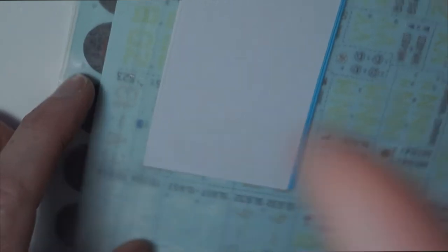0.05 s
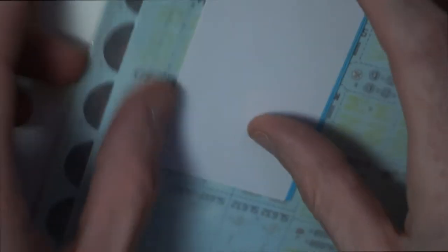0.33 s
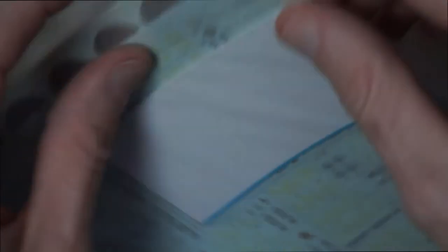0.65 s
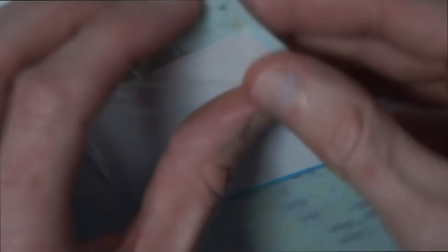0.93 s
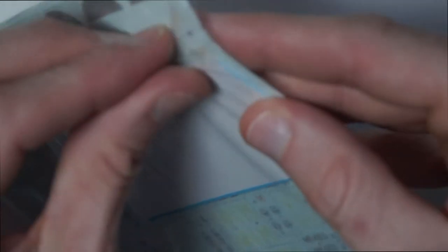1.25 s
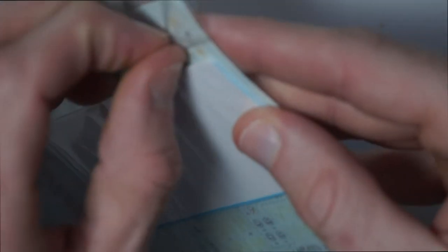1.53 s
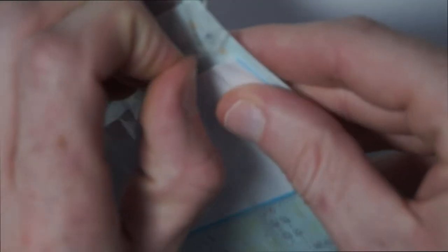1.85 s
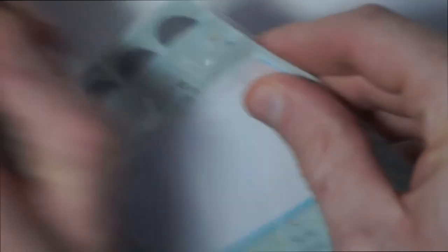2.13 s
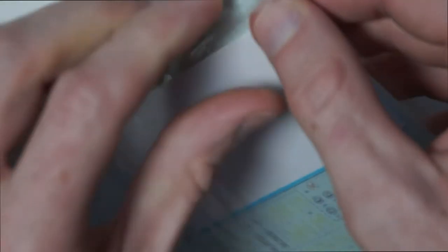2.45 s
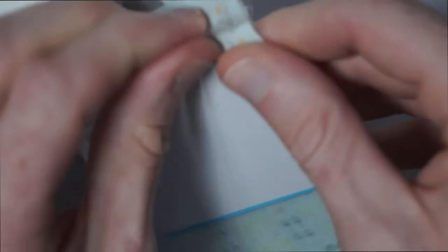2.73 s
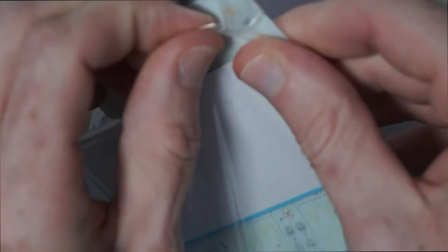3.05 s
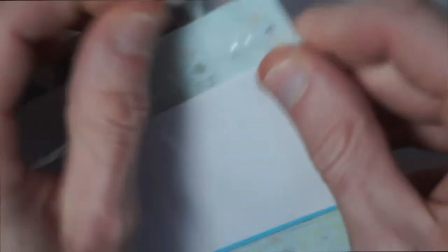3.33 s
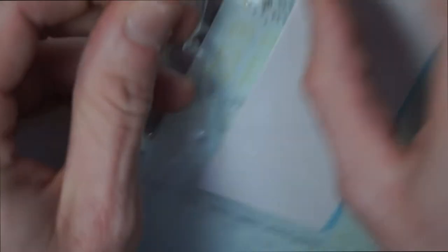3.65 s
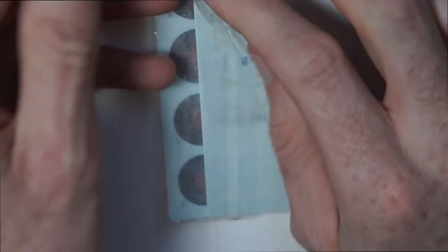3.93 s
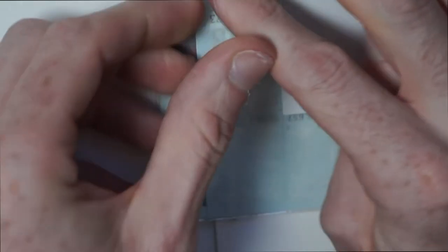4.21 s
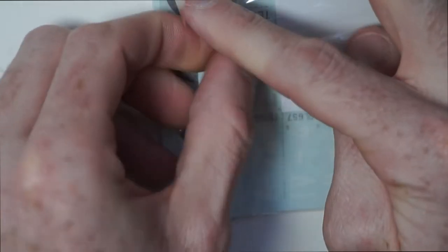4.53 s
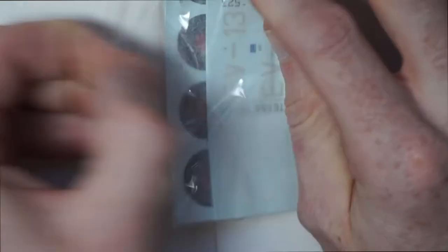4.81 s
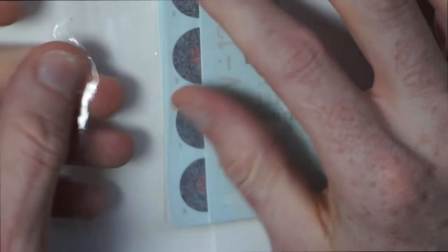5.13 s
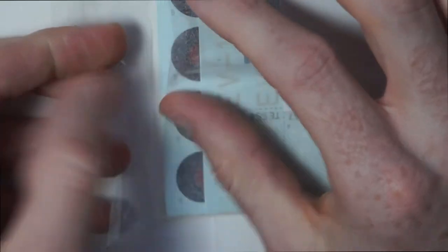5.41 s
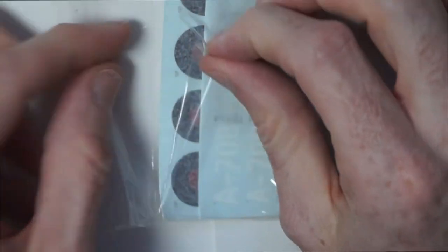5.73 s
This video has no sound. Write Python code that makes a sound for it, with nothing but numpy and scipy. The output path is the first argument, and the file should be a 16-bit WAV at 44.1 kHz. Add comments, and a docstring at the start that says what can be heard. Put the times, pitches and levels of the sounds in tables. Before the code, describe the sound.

Hands work thin decal sheets out of a plastic sleeve, close to the microphone in a small room. At first the sheets slide softly with a grainy hiss, fingertip rubs and scattered dry snaps. The sleeve crumples loudly about halfway through and again a little later, then gives a run of small pops. Faint room noise lies underneath.

```python
"""Small room, stereo microphone close to two hands working thin decal sheets out of a plastic sleeve.
For three seconds the sheets slide softly with a grainy hiss, fingertips rub the film and creases pop over
with dry snaps that ring for a few cycles. The sleeve crumples loudly at 3.2 s and again at 4.7 s;
a run of small pops fills the last second. Faint room noise lies under it all."""
import sys
import numpy as np
from scipy import signal
from scipy.fft import rfft, irfft, next_fast_len
from scipy.io import wavfile
from scipy.ndimage import uniform_filter1d

SR = 44100
rng = np.random.default_rng(int(sys.argv[2]) if len(sys.argv) > 2 else 0)


def put_to_file(sound):
    """Save the sound as 16-bit audio at rate SR, in the file named by the first command-line argument."""
    columns = np.atleast_2d(sound).T  # one column per channel
    safe = np.clip(columns, -1, 1)
    whole_steps = np.round(safe * 32767)
    wavfile.write(sys.argv[1], SR, whole_steps.astype(np.int16))


N = 258867

# pushes of the hands: start/s, rise/s, hold/s, relative friction level/dB, body lift/dB, treble lift/dB
PUSHES = [(0, 0.0033, 0.023, -58, -3, -2), (0.215, 0.062, .05, -49, 8.5, -3),
          (.335, 0.091, 0.0035, -48, 8, 0), (0.512, 0.0096, 0.084, -57.5, -1, 11),
          (0.618, 0.0083, 0.0046, -43, -3, 0), (0.819, 0.047, 0.076, -42, 1.5, -0.5),
          (1.019, 0.016, 0.0052, -45, -1.5, 0.5), (1.093, 0.031, 0.21, -55, -2, 2.5),
          (1.365, 0.013, 0.016, -48, -2, 3), (1.64, 0.018, 0.29, -49.5, 4.5, 0),
          (1.773, 0.013, 0.042, -44.5, -4, -0.5), (1.903, 0.044, .01, -43, -8, 4),
          (2.026, 0.0032, 0.0051, -46, -2, 16), (2.102, 0.0029, 0.015, -35, 1, 1),
          (2.176, 0.032, 0.079, -55.5, -4, 7), (2.376, 0.043, .08, -56.5, 10, 4),
          (2.558, 0.031, 0.0081, -46.5, 5.5, 1), (2.651, 0.0062, 0.05, -47.5, 2, 3.5),
          (2.715, 0.051, .04, -36, -5.5, 0.5), (2.939, 0.053, 0.0056, -54, -6.5, 6.5),
          (3.154, 0.056, 0.0077, -41, 0.5, -0.5), (3.2, 0.0072, 0.033, -15.5, -9.5, -2.5),
          (3.304, .04, .02, -38, 1, -1), (3.451, 0.0082, 0.049, -36.5, -1.5, -4.5),
          (3.505, 0.008, .004, -34, 2.5, 2), (3.547, 0.038, 0.19, -51, 1.5, 3.5),
          (3.793, 0.019, 0.058, -42, -4.5, -2.5), (3.891, 0.0077, 0.0054, -32.5, -3, 0),
          (3.892, .02, 0.091, -49.5, 16.5, -3), (4.273, 0.037, 0.018, -38, -4, -2.5),
          (4.457, 0.022, 0.06, -35, -6, -2.5), (4.597, 0.11, 0.031, -41, 2.5, 1),
          (4.737, 0.0052, .092, -21.5, -10, 1.5), (4.892, 0.0049, 0.0072, -29.5, -6, -9),
          (5.009, 0.0078, 0.03, -42, -4.5, -12.5), (5.093, 0.016, 0.029, -37, -9, -3.5),
          (5.297, 0.052, .06, -48.5, 1, -0.5), (5.546, 0.01, 0.1, -47.5, -0.5, 1.5),
          (5.714, 0.01, 0.1, -44, -7, -1.5)]
# sheets merely held never lie quite still: relative friction level/dB, body lift/dB, treble lift/dB
HELD_FRICTION = (-63.5, 7.9, -9.5)
# creases cracking over: t/s, level/dB, body lift/dB, treble lift/dB
CREASE_CRACKS = [(0.2027, -63, 26, -20), (0.388, -35.5, 11.5, -7.5), (.437, -40.5, 3, 2),
                 (0.4717, -43.5, -1, -2.5), (0.5269, -44.5, 4, 8), (.632, -50, -12, 11.5),
                 (0.6432, -42, -5, 10), (.84, -40.5, 5, -9), (0.8624, -48, 4, 8), (0.995, -45, -10, -9),
                 (1.078, -39, -10, -5), (1.1203, -45.5, 9, 5), (1.1585, -43, 4, 3.5),
                 (1.1705, -39.5, -33, -0.5), (1.2115, -41.5, -7, 1.5), (1.2861, -42.5, 2.5, 5.5),
                 (1.3432, -49.5, -4, 6), (1.3876, -40, -5, 5.5), (1.446, -51, 8.5, 5),
                 (1.6283, -55.5, -6, 10), (1.653, -45.5, 6, 13), (1.6744, -43, -5, -2),
                 (1.7928, -37.5, -10, 4), (1.8282, -34.5, -7, -2), (1.9416, -45, 16.5, 7),
                 (1.968, -30, -18, -12), (2.0311, -39, -4, 17), (2.1018, -27, 7, 1.5),
                 (2.122, -30.5, -7, 3), (2.2196, -39, -8, 3.5), (2.2845, -37.5, -10, 1),
                 (2.5709, -54, 6, 14), (2.655, -52, 2, 17.5), (2.7896, -42.5, -6, 2),
                 (2.8327, -36.5, 2.5, 6.5), (2.8552, -41, 10.5, 6.5), (2.944, -39.5, 1.5, 2.5),
                 (2.983, -35.5, -10.5, 0.5), (3.0706, -50, 8, -3.5), (3.0956, -37.5, -2, -8),
                 (3.1495, -46, -7, 4), (3.2036, -26.5, -13, 13), (3.3368, -30, -9, 7.5),
                 (3.4716, -37, -20, -2.5), (3.5217, -24.5, -0.5, -4), (3.833, -40.5, 2.5, 7),
                 (3.896, -28, -7, -7), (3.9169, -39, -6, 11.5), (4.119, -45, -1, 2.5),
                 (4.184, -45.5, -5, -19), (4.2495, -45, 1, -6), (4.3177, -43.5, -8.5, 2.5),
                 (4.4525, -51.5, 6.5, 9.5), (4.484, -31.5, -13, 2), (4.5422, -31.5, -21, 0.5),
                 (4.728, -15.5, -13.5, -5), (4.7407, -18, -18.5, -2.5), (4.794, -26.5, 1.5, 10),
                 (4.847, -17.5, -13, -25), (4.8963, -23.5, -6, 4.5), (5.371, -44.5, -14, 9.5),
                 (5.6365, -48.5, -10, 14.5), (5.7762, -34.5, -19.5, 0), (5.823, -38, 1.5, 5.5)]
# sleeve facets popping through: t/s, ring f/Hz, relative ring level/dB, crack level/dB, treble lift/dB
SLEEVE_POPS = [(1.389, 912, -47, -66, -15), (3.5221, 1027, -32, -30, -17), (3.7563, 1742, -46.5, -48, -21),
               (3.8183, 2403, -45.5, -39, -11), (4.5901, 3190, -40.5, -42, 9),
               (4.624, 3500, -45.5, -47, -8), (4.7568, 2840, -25, -27, 8), (4.8338, 3225, -24.5, -38, 1),
               (5.0118, 2960, -45, -31.5, -13), (5.0443, 2070, -43, -38.5, -4.5),
               (5.0984, 2120, -38, -41, -3), (5.1107, 2700, -39, -34, 1.5),
               (5.1369, 2910, -42, -18.5, -11.5), (5.169, 2770, -51, -30.5, -9),
               (5.2389, 2570, -38.5, -34.5, -10.5), (5.2824, 4380, -46, -45.5, 1.5),
               (5.3143, 2830, -45.5, -33.5, -18.5), (5.3476, 3680, -53, -30.5, -6),
               (5.427, 3760, -44.5, -40, -1), (5.5055, 2920, -52, -48, -11),
               (5.611, 4160, -47.5, -36.5, -3), (5.6566, 3575, -35.5, -35, -9.5),
               (5.695, 2980, -48.5, -39, -4), (5.7282, 2830, -34, -30.5, -7)]
# fingertips and sheet edges dragging on the film: start/s, peak/s, end/s, f/Hz, width/Hz, level/dB
FILM_RUBS = [(0.336, 0.343, 0.387, 784, 790, -40.5), (0.367, 0.379, .416, 830, 676, -41.5),
             (0.37, 0.385, .418, 1700, 1400, -42), (0.428, 0.603, 0.74, 1540, 501, -65),
             (2.096, 2.117, 2.15, 531, 377, -52), (2.38, 2.481, 2.63, 1685, 601, -67),
             (2.735, 2.787, 2.83, 2510, 800, -49), (3.208, 3.253, 3.29, 1201, 600, -36.5),
             (3.204, 3.234, 3.28, 4682, 416.3, -33.5), (3.565, 3.613, 3.648, 1570, 446.6, -47),
             (3.598, 3.627, 3.648, 2257, 500, -50), (3.95, 3.98, 4.14, 1113, 130.8, -61.5),
             (4.734, 4.8, 4.9, 3093, 1363, -33), (5.092, 5.151, 5.2, 3506, 1405, -47.5),
             (5.646, 5.643, 5.75, 3910, 894, -55)]
# colour of everything heard close by, with fixed humps near 1 kHz, 1.55 kHz and 2.9 kHz: f/Hz, level/dB
CLOSE_COLOUR = [(30, -26), (110, -27.5), (190, -23), (290, -12.5), (440, -7), (770, -3), (1020, 0),
                (1280, -3), (1550, 0.5), (2000, -3), (2900, -1), (5500, -1.5), (10000, -1.98),
                (15500, -2.1)]
# reach of the body lift, from a whole sheet bending: f/Hz, share/0..1
BODY_SHARE = [(110, 0.7), (330, 0.78), (800, 1), (1300, 0.69), (2600, 0.02)]
# reach of the treble lift, from the fine edges: f/Hz, share/0..1
TREBLE_SHARE = [(3200, 0), (5500, 0.47), (8500, 0.98)]
# likeness of the two microphone ports for close sound: f/Hz, correlation/-1..1
CLOSE_LIKENESS = [(40, 0.8), (150, 0.75), (300, 1), (900, 0.92), (2600, 0.87), (5000, 0.61), (9000, 0.32),
                  (15000, 0.27)]
# decay of the small room: f/Hz, t60/s
ROOM_DECAY = [(150, 0.13), (600, 0.15), (2500, 0.13), (7000, 0.13), (15000, 0.074)]
# colour of room noise and microphone hiss: f/Hz, level/dB
FLOOR_COLOUR = [(25, -19), (130, -11.5), (250, -5), (450, 3), (750, 1.5), (1100, 2), (1600, 0),
                (2500, -2.5), (5000, -6), (10000, -8.5), (15500, -10)]
# likeness of that noise in the two ports: f/Hz, correlation/-1..1
FLOOR_LIKENESS = [(50, 0.18), (300, -0.1), (750, -0.76), (1200, -0.43), (2000, -0.33), (6000, 0.14),
                  (15000, -0.11)]

LIGHT_PUSH_DB = -52  # friction of a light push; above it catches crowd together and crinkles grow
HAND_STEP = 64  # samples between readings of the hands' effort


def sliding(catches_per_s=600, crowd_slope=0.55, spread_db=4, catch_s=0.0019, hiss=0.75, patchy_db=2.5):
    """Sheet catches on sheet over a smooth hiss; each moment a different patch of film radiates."""
    grid = np.arange(0, N, HAND_STEP) / SR
    level_db, body_db, treble_db = handling(grid)
    effort_db = np.maximum(np.interp(np.arange(N) / SR, grid, level_db) - LIGHT_PUSH_DB, 0)
    crowding = from_db(crowd_slope * effort_db)  # harder work, denser catches
    sizes = from_db(spread_db * np.minimum(rng.exponential(1, N), 4))
    sizes *= rng.random(N) < crowding * catches_per_s / SR
    catch_power = signal.lfilter([1], [1, -np.exp(-2 / (catch_s * SR))], sizes ** 2 / crowding)
    friction = unit_rms(port_noise(N) * np.hypot(hiss, unit_rms(np.sqrt(catch_power))))
    hz, t, spectra = signal.stft(friction, SR, nperseg=256, noverlap=192)
    patches = uniform_filter1d(rng.standard_normal(spectra.shape[1:]), size=4, axis=0)
    patches = unit_rms(uniform_filter1d(patches, size=12, axis=1))
    lift_db = sheet_lift(hz[:, None], np.interp(t, grid, body_db), np.interp(t, grid, treble_db))
    spectra *= from_db(np.interp(t, grid, level_db) + lift_db + patchy_db * patches)
    slide = signal.istft(spectra, SR, nperseg=256, noverlap=192)[1][:, :N]
    return panned(from_db(-3.5) * coloured(slide, CLOSE_COLOUR), left_db=-0.5)


def handling(t, settle_db_per_s=210):
    """Each push swells, holds and settles; gives friction level, body and treble in dB at times t."""
    start, rise, hold, level_db, body_db, treble_db = np.transpose(PUSHES)[:, :, None]
    settled_db = settle_db_per_s * np.maximum(t - start - rise - hold, 0)
    power = (np.clip((t - start) / rise, 0, 1) * from_db(level_db - settled_db)) ** 2
    held_db, held_body_db, held_treble_db = HELD_FRICTION
    held_power = from_db(held_db) ** 2
    total = power.sum(0) + held_power
    body = ((power * body_db).sum(0) + held_power * held_body_db) / total
    treble = ((power * treble_db).sum(0) + held_power * held_treble_db) / total
    return 10 * np.log10(total), body, treble


def sheet_lift(hz, body_db, treble_db):
    """Wide bends add body, tight creases and edges add treble; gives dB at each frequency."""
    return body_db * lookup(BODY_SHARE, hz) + treble_db * lookup(TREBLE_SHARE, hz)


def snap(level_db, body_db, treble_db, ring_hz, ring_db, crack_s=0.00015, rattle_s=0.0031, ring_cycles=2.2):
    """A crease buckles: a sharp crack, waves rattling through the film, a few cycles of the freed facet."""
    size = 2048
    t = np.arange(size) / SR
    burst = unit_rms(port_noise(size) * (np.exp(-t / crack_s) + 0.91 * np.exp(-t / rattle_s)))
    hz = abs(np.fft.fftfreq(size, 1 / SR))
    gain = from_db(lookup(CLOSE_COLOUR, hz) + sheet_lift(hz, body_db, treble_db))
    minimum_phase = np.exp(np.conj(signal.hilbert(np.log(gain))))  # keeps the attack sharp
    crack = np.fft.ifft(np.fft.fft(burst) * minimum_phase).real
    cycles = ring_hz * t
    swing = np.sin(2 * np.pi * cycles) * np.exp(-cycles / ring_cycles) * (1 - np.exp(-2 * cycles))
    ring = unit_rms(np.gradient(swing))  # a small facet radiates no bass
    sound = from_db(level_db) * crack + from_db(ring_db - 2) * ring
    sound *= np.sqrt(0.006 * SR / size)  # levels refer to a 6 ms span
    return panned(sound, left_db=-1.5)  # the hands work slightly right of the microphone


def crinkles(per_s=20, crowd_slope=0.4, light_db=-54, spread_db=3.5, low_hz=2200, high_hz=5000):
    """Small creases give way at random, oftener and stronger under a harder push; gives timed snap rows."""
    gap, size, pitch = rng.random((260, 3)).T
    grid = np.arange(0, N, HAND_STEP) / SR
    rate = per_s * from_db(crowd_slope * (handling(grid)[0] - LIGHT_PUSH_DB))
    times = np.interp(np.cumsum(-np.log(1 - gap)), np.cumsum(rate) * grid[1], grid)
    push_db, body_db, treble_db = handling(times)
    scatter_db = spread_db * np.minimum(-np.log(1 - size), 2)
    level_db = light_db + 0.81 * (push_db - LIGHT_PUSH_DB) + scatter_db
    ring_hz = low_hz * (high_hz / low_hz) ** pitch
    return np.transpose([times, level_db, body_db, treble_db, ring_hz, level_db - 13])[times < grid[-1]]


def rub(start, peak, end, hz, width_hz, level_db, slips_per_s=1500):
    """A fingertip or sheet edge sticks and slips unevenly, driving one resonance of the taut film."""
    t = np.arange(start, end, 1 / SR)
    slips = (rng.standard_normal(SR) * (rng.random(SR) < slips_per_s / SR))[:len(t)]
    edges_hz = [max(hz - width_hz / 2, 100), hz + width_hz / 2]
    resonance = signal.butter(2, edges_hz, "bandpass", fs=SR, output="sos")
    pressure = np.sqrt(np.interp(t, [start, peak, end], [0, 1, 0]))
    return panned(from_db(level_db) * pressure * unit_rms(signal.sosfilt(resonance, slips)), left_db=0)


def room(direct, desk_db=-11, desk_s=0.0025, tail_db=-10):
    """Quick reflections off desk and hands reach the microphone, then the short tail of the room."""
    size = SR // 2
    t = np.arange(size) / SR
    hz, frame_s, spectra = signal.stft(port_noise(size), SR, nperseg=256)
    spectra *= from_db(-60 * frame_s / lookup(ROOM_DECAY, hz)[:, None])
    tail = signal.istft(spectra, SR, nperseg=256)[1][:, :size] * (t > 0.007)
    desk = port_noise(size) * np.exp(-t / desk_s) * (t > 0.0015)
    echoes = (from_db(tail_db) * unit_rms(tail) + from_db(desk_db) * unit_rms(desk)) / np.sqrt(size)
    return signal.fftconvolve(direct, echoes, axes=1)[:, :N]


def room_tone(level_db=-58.5):
    """Faint steady room noise and microphone hiss, wide around the ports."""
    return from_db(level_db) * unit_rms(coloured(port_noise(N, FLOOR_LIKENESS), FLOOR_COLOUR))


def port_noise(length, likeness=CLOSE_LIKENESS):
    """White noise as the microphone's two ports hear it, partly alike at each frequency."""
    size = next_fast_len(length, True)
    mid, side = rfft(rng.standard_normal((2, length)), size)
    correlation = lookup(likeness, np.fft.rfftfreq(size, 1 / SR))
    mid *= np.sqrt((1 + correlation) / 2)
    side *= np.sqrt((1 - correlation) / 2)
    return irfft(np.array([mid + side, mid - side]), size)[:, :length]


def coloured(x, colour):
    """Filters by a spectrum table."""
    size = next_fast_len(x.shape[-1], True)
    gain = from_db(lookup(colour, np.fft.rfftfreq(size, 1 / SR)))
    return irfft(rfft(x, size) * gain, size)[..., :x.shape[-1]]


def lookup(table, hz):
    """Reads a table on a log-frequency axis."""
    table_hz, values = np.transpose(table)
    return np.interp(np.log(hz + 1), np.log(table_hz), values)


def from_db(db):
    """Decibels to gain."""
    return 10 ** (np.asarray(db) / 20)


def unit_rms(x):
    """Scales to rms 1."""
    return x / np.sqrt(np.mean(x ** 2) + 1e-20)


def panned(x, left_db):
    """Sets the left channel left_db above the right."""
    return x * from_db([[left_db / 2], [-left_db / 2]])


def add(mix, start, sound):
    """Mixes a stereo sound in from start, in seconds."""
    part = mix[:, max(round(start * SR), 0):][:, :sound.shape[1]]
    part += sound[:, :part.shape[1]]


def scene(pop_body_db=-41):
    """Sliding, creases, sleeve pops, rubs and crinkles close to the microphone, the room behind them."""
    sheets = sliding()
    for start, level_db, body_db, treble_db in CREASE_CRACKS:
        add(sheets, start, snap(level_db, body_db, treble_db, ring_hz=3950, ring_db=level_db - 15.5))
    for start, ring_hz, ring_db, crack_db, treble_db in SLEEVE_POPS:
        body_db = pop_body_db - crack_db  # every pop shakes the whole sleeve about equally
        add(sheets, start, snap(crack_db, body_db, treble_db, ring_hz, ring_db))
    for start, *contact in FILM_RUBS:
        add(sheets, start, rub(start, *contact))
    floor = room_tone()
    for start, *crinkle in crinkles():
        add(sheets, start, snap(*crinkle))
    return sheets + room(sheets) + floor


def record(dry, cutoff_hz=16000):
    """The recorder's band limit."""
    lowpass = signal.firwin(301, cutoff_hz, window=("kaiser", 8), fs=SR)
    return signal.oaconvolve(dry, lowpass[None], "same")


dry = scene()
out = record(dry)
put_to_file(out)
```